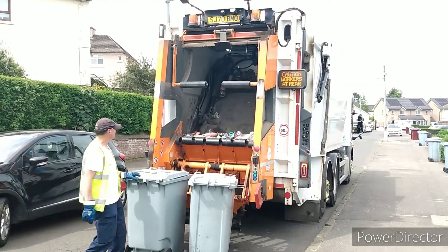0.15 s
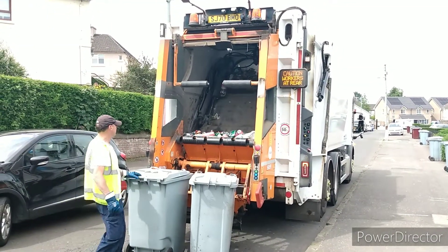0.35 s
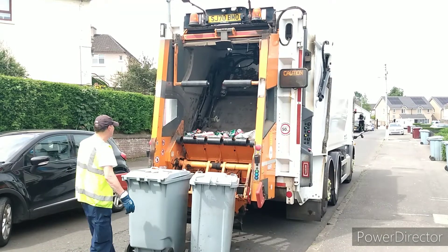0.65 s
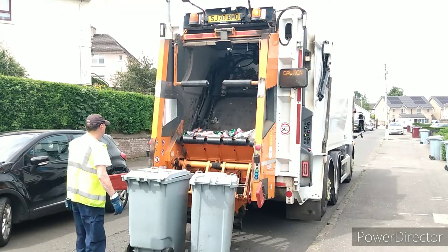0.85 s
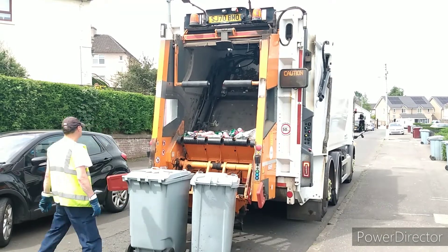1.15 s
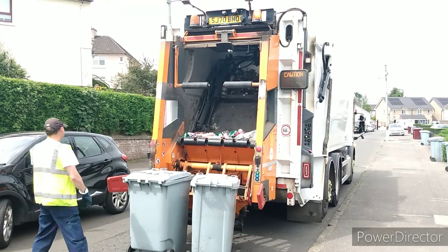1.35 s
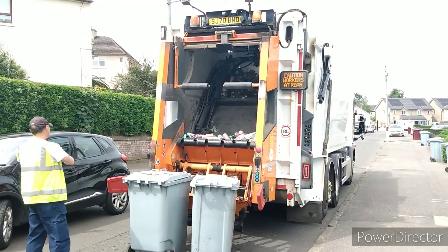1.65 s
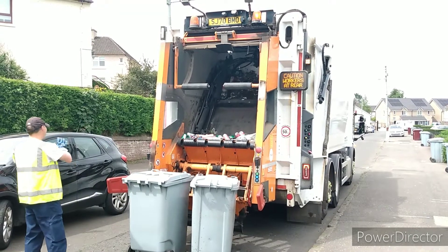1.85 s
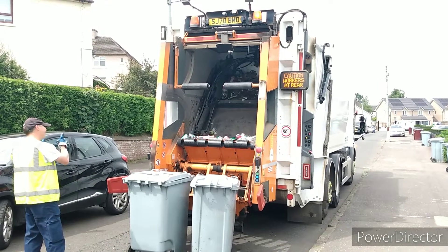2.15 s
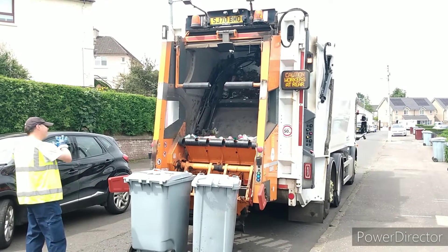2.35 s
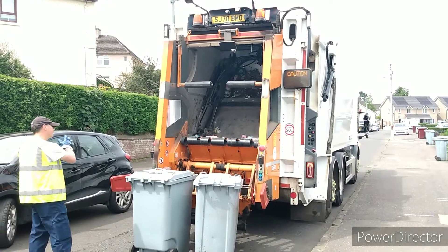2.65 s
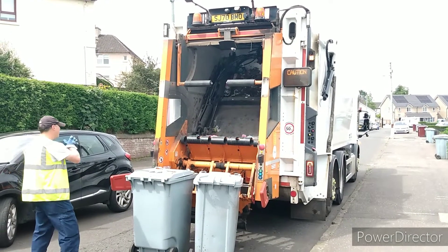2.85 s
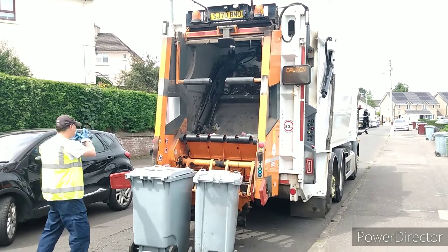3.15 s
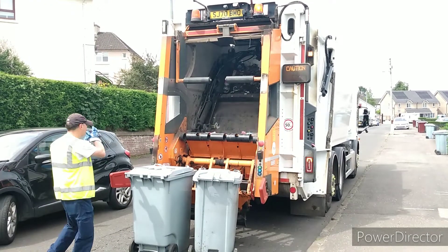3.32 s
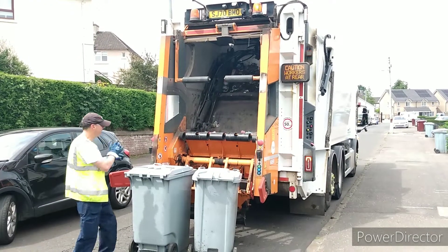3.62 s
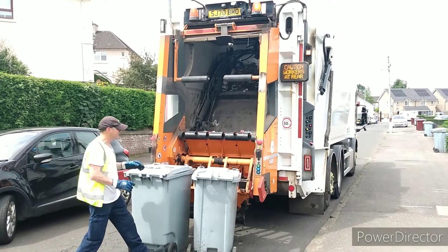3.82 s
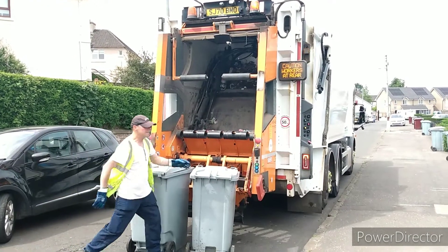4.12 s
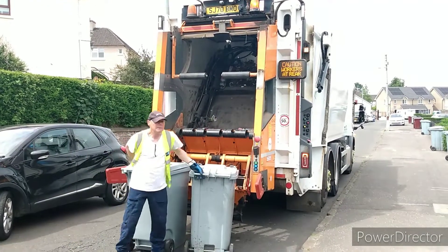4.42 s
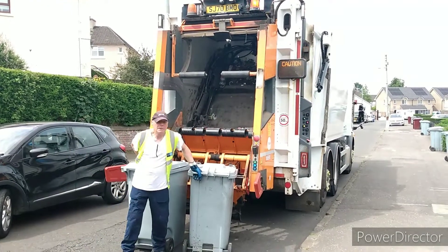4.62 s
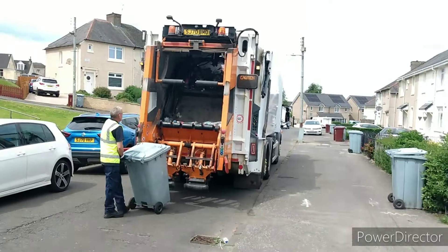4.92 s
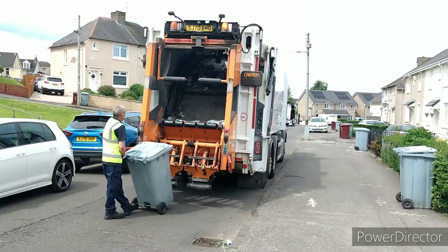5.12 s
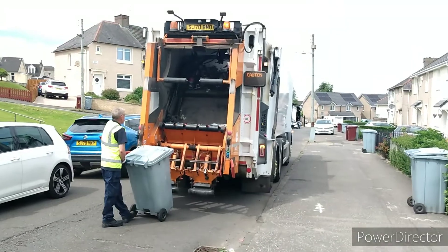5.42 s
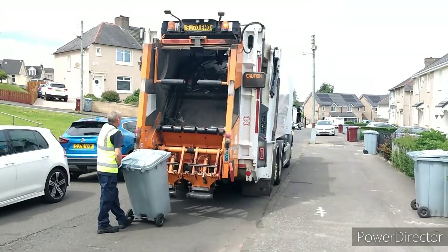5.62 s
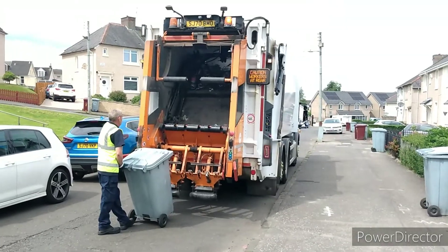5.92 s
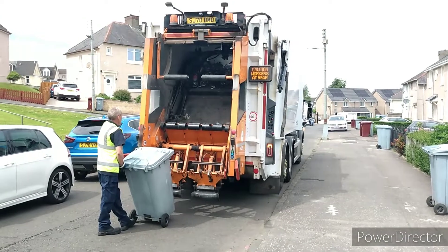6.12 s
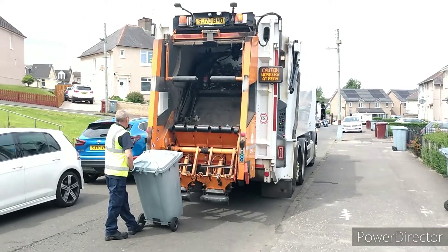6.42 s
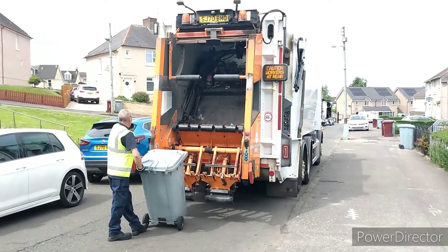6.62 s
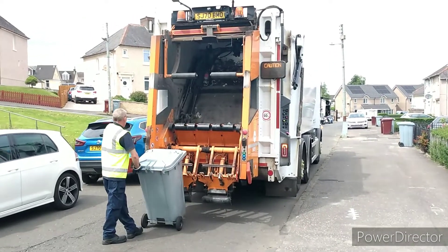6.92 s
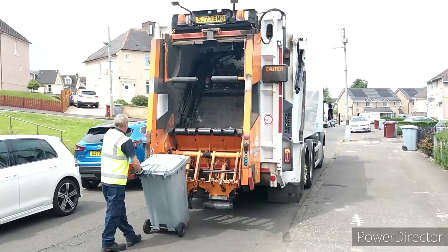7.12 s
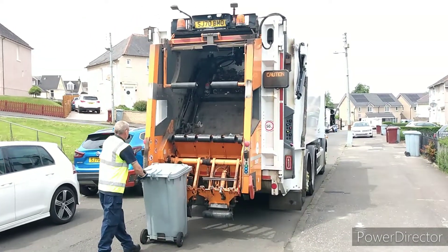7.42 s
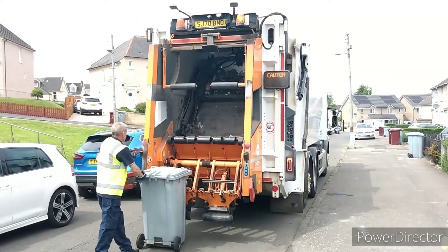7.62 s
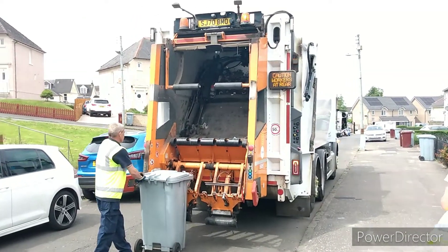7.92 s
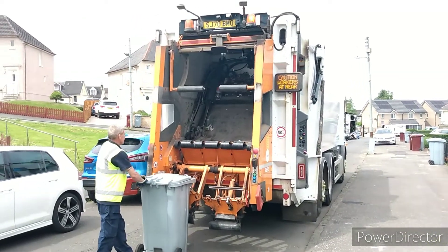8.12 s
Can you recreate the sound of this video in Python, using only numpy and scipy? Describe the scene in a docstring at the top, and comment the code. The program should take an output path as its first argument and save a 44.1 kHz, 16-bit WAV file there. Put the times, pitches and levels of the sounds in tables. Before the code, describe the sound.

Two stretches of a bin lorry working: throbbing engine, swelling oil hiss, rumbling hopper, rattling metal blows, and wind thumps near the end.

```python
"""Refuse truck at the kerb

Two stops with a short silence between them, all built from shaped noise, struck modes and tones.
The diesel clatters behind the body, and oil hisses through the valves as the packer plate moves.
The hopper rumbles in lumpy bass; steel, bins and body ring under rattling blows, with scrapes and ticks.
Narrow hums waver, and near the end wind buffets the left microphone port in sharp pulses."""
import sys
import numpy as np
from scipy import signal
from scipy.fft import rfft, irfft
from scipy.io import wavfile
from scipy.ndimage import uniform_filter1d

SR = 44100
rng = np.random.default_rng(int(sys.argv[2]) if len(sys.argv) > 2 else 0)


def file_out(sig):
    """Save sig as 16-bit WAV at sys.argv[1]."""
    # one column per channel
    cols = np.atleast_2d(sig).T
    # limit, then scale
    lim = np.clip(cols, -1, 1)
    pcm = np.round(lim * 32767).astype(np.int16)
    wavfile.write(sys.argv[1], SR, pcm)


N = 364266
T = np.arange(N) / SR
HZ = np.fft.rfftfreq(1024, 1 / SR)  # bins of the shaped noise
FRAME_S = np.arange(N // 256 + 5) * 256 / SR  # frames of the shaped noise

# the two stops: start t/s, end t/s
STOPS = [(0, 4.885), (4.982, 8.26)]

# stereo likeness of the shaped noise: f/Hz, left-right likeness (1 = alike)
LIKENESS = [(60, 0.95), (300, 1), (700, 0.96), (1400, 0.091), (2500, 1), (4000, 0.051), (15000, 0.065)]
# cavity resonances of the two ports, one list a stop: f/Hz, left-right level/dB
PORT_LEAN = [
    [(200, 3), (500, 3.5), (770, -3), (1150, 1), (1800, -3.5), (2700, -7), (3600, 0.5), (4900, 8.5),
     (6200, 5.5), (7600, 2.5), (9300, 12.5), (10600, 9.5), (12000, 5.5), (16000, -1.5)],
    [(200, 11), (500, 7), (770, -6), (1100, 5), (1800, -4), (2700, -5), (3900, 2.5), (4900, 12.5),
     (6200, 8.5), (7400, -1), (9200, 17.5), (10600, 12.5), (12000, 9.5), (16000, -8)],
]
LAG_S = 4 / SR  # the right port hears the truck later
PATCHY_DB = 1.5  # drifting patches in the noise

# clatter coloured by body panels and ground echo, one list a stop: f/Hz, relative level/dB per Hz
ENGINE_COLOUR = [
    [(300, -48), (420, -44), (520, -1), (700, 1.5), (850, -3), (1000, -3.5), (1200, -2), (1420, -4.5),
     (2100, -1), (2600, -3), (3200, -7.5), (4800, -16), (7000, -17), (9500, -48), (16000, -82)],
    [(300, -28), (440, -20), (520, -5.5), (700, 0.5), (850, -3.5), (1030, -9), (1250, -2.5), (1500, -9),
     (2100, -2.5), (2600, -6), (3400, -9.5), (4100, -23.5), (5500, -14.5), (8000, -26), (9000, -61),
     (16000, -94)],
]
# one list a stop: t/s, engine level/dB, resting hiss of the oil lines level/dB
RUNNING = [
    [(0, -33, -38.5), (.71, -34, -42), (1.34, -33.5, -41.5), (1.82, -30, -37.5), (2.0, -26.5, -33),
     (2.33, -26, -28), (2.65, -30, -28), (2.87, -28.5, -34), (3.116, -34, -37.5), (3.512, -37, -39),
     (3.778, -36.5, -43), (4.578, -38.5, -52.5), (4.72, -37, -65), (4.885, -41, -55.5)],
    [(4.982, -28, -34), (5.17, -30.5, -37), (5.5, -27.5, -34.5), (6.12, -31, -33.5), (6.17, -35, -34),
     (6.43, -38.5, -41.5), (6.69, -35, -35), (6.87, -32.5, -38.5), (7.3, -38.5, -47.5),
     (8.26, -38.5, -58.5)],
]
THROB_PER_S = 17  # mean rate of the firing throb
THROB_WORK_DB, THROB_IDLE_DB = -0.5, 1.5  # the throb stands out once a stroke is over
RATTLE_DB = 1.5  # quick uneven rattle of the panels

# valve hiss, one list a stop: f/Hz, relative level/dB per Hz
OIL_COLOUR = [
    [(1650, -11.5), (2800, -8), (2880, -27), (3240, 6), (3510, 2), (3860, 3), (4800, -1), (6770, -2.5),
     (7550, 0.5), (10300, -1.5), (11400, -3), (13000, -3), (15100, -4), (16000, -53)],
    [(1650, -33), (2800, -24), (2930, -28), (3170, 1), (3690, 3.5), (4770, 0), (6070, 0.5), (6570, 0.5),
     (8240, 1), (9890, -5.5), (10600, -3), (14600, -2.5), (15500, -26), (16000, -38)],
]
# whistling pipe resonances, one list a stop: f/Hz, width/Hz (30 at least is used), relative level/dB
PIPES = [
    [(3040, 110, 4), (4580, 24, -35), (4820, 27, 23), (7600, 230, 6), (8600, 58, -18), (9600, 38, -20),
     (8850, 120, -4), (10200, 38, -2.5), (10400, 50, -2), (10400, 200, -2)],
    [(3260, 140, -1.5), (4270, 92, -1.5), (4710, 85, 0.5), (5120, 26, 4), (6020, 180, -2), (7320, 39, 2.5),
     (7540, 32, -3), (9350, 170, -20), (10600, 91, -25), (11700, 38, -5)],
]
# strokes of the packer plate: valve opens t/s, full flow t/s, middle of the shutting t/s, hiss level/dB
STROKES = [(1.79, 2.5, 2.87, -28.5), (5.194, 5.484, 6.145, -27)]
WHISTLE = 4.0  # most power that a pipe adds, over the plain hiss
EASE_S, EASE_DB, SHUT_S = 0.061, -3.5, 0.066  # the flow eases off before the valve shuts
REST_TOP_HZ, REST_DULL_DB = 10500, -6  # the resting hiss lacks the top of the full flow
TICK_HZ, TICK_DB, TICK_THROB = (8800, 10200), -2, 2.2  # the resting hiss ticks with the firing in this band

# rumble of the hopper: f/Hz, relative level/dB per Hz
HOPPER_COLOUR = [(12, -56), (20, -8.5), (87, -7.5), (162, -5), (215, -1.5), (307, -8), (414, -12.5),
                 (600, -14), (780, -52), (1320, -120)]
# low boom of the hopper, one list a stop: t/s, level/dB, left-right level/dB
HOPPER_BOOM = [
    [(0, -43, 3), (.2, -52.5, 3), (1.28, -56, 3.5), (1.56, -50, 0.5), (1.99, -35.5, -1),
     (2.09, -25.5, -4.5), (2.75, -41, -2), (3.1, -37.5, 1), (3.25, -41.5, 1.5), (3.55, -57, -2),
     (3.72, -41, -3), (4.3, -57.5, 2), (4.55, -49, 3), (4.885, -52.5, 3)],
    [(4.982, -27.5, -10), (5.158, -31, -11), (5.408, -24.5, -11), (5.692, -38.5, -11), (6.146, -31, -10),
     (6.32, -47, -7), (6.42, -35, 3), (6.6, -41, -8), (6.9, -40, -10), (7.0, -39, 30), (8.26, -51.5, 20)],
]
# the load shifts and drums on the hopper floor: loudest t/s, level/dB, slope either side/dB per s
SHIFTS = [(.08, -39, 107), (.34, -52, 150), (.5, -47.5, 118), (.67, -49.5, 108), (1.1, -39.5, 91),
          (1.41, -45, 102), (1.6, -37.5, 100), (1.85, -37, 107), (2.09, -30, 60), (2.252, -32.5, 58),
          (2.45, -36.5, 39), (2.71, -32.5, 67), (2.91, -33.5, 80), (3.03, -38.5, 130), (3.32, -36, 243),
          (3.39, -50, 200), (3.78, -31, 186), (4.16, -47, 192), (4.48, -54.5, 200), (4.72, -46.5, 129),
          (5.12, -31, 151), (5.408, -38.5, 35), (5.836, -36, 46), (6.04, -35, 92), (6.408, -43, 135),
          (6.664, -40.5, 250), (6.86, -32.5, 153), (7.0, -56, 20)]
DRUM_REST_DB, BOOM_LUMPS_DB = -78, 1.0

# bright treble ticks, among them a run of engine ticks near 6.2-6.6 s: t/s, level/dB, t60/s
TICKS = [(0.113, -32, 0.37), (0.399, -31.5, 0.19), (0.718, -28, 0.05), (1.147, -30, 0.064),
         (1.4894, -30, 0.16), (4.3464, -39, 0.047), (4.4924, -49, 0.1), (6.2218, -28, 0.061),
         (6.2562, -28.5, 0.13), (6.306, -30, 0.16), (6.3704, -37, 0.092), (6.4248, -29, 0.048),
         (6.47, -28.5, 0.14), (6.5046, -27, 0.13), (6.5804, -26, 0.062), (6.6356, -27.5, 0.42),
         (6.789, -35, 0.22), (7.2135, -35, 0.078), (7.291, -29, 0.12), (7.9694, -46, 0.046)]
# treble of scrapes and ticks: f/Hz, relative level/dB per Hz
SCRAPE_COLOUR = [(1200, -36), (2500, 1), (4500, -4.5), (7000, -4), (9500, -6.5), (12000, -8.5),
                 (16000, -10.5)]

# blows, and one soft bump of wind at 7.03 s: t/s, clang level/dB, drum level/dB, boom level/dB,
# treble level/dB, build-up/s, rattle length/s, clang centre f/Hz, drum centre f/Hz
KNOCKS = [(0.216, -35, -38.5, -64, -32, 0.0017, 0.046, 2070, 325),
          (0.566, -28.5, -75, -65, -29.5, 0.013, 0.071, 1670, 428),
          (.822, -33, -75, -66, -38, 0.004, 0.013, 2300, 300),
          (0.957, -24.5, -29.5, -50, -26.5, .015, 0.054, 700, 264),
          (1.27, -31, -43, -64, -47, 0.0025, 0.042, 1180, 207),
          (1.524, -30.5, -45, -66, -37, 0.0025, 0.051, 2190, 231),
          (1.801, -27.5, -32.5, -47, -32, 0.0033, 0.093, 1210, 207),
          (1.856, -17.5, -24.5, -26, -26.5, 0.0027, 0.027, 1040, 229),
          (1.966, -14.5, -24, -18, -22, 0.0022, 0.033, 1150, 310),
          (1.993, -19, -27, -42, -42, 0.0038, 0.012, 693, 250),
          (2.119, -25.5, -21.5, -35, -30, 0.0021, 0.089, 2210, 221),
          (2.277, -20, -23, -42, -24, 0.0024, 0.029, 810, 290),
          (2.635, -25.5, -26.5, -20.5, -39, 0.0019, 0.042, 710, 151),
          (3.627, -23.5, -18, -33, -30.5, .011, 0.033, 540, 248),
          (3.901, -33.5, -53, -60, -52, .002, 0.015, 2260, 229),
          (4.564, -33, -43, -64, -46, .008, 0.042, 2180, 218),
          (4.697, -52, -35, -68, -52, 0.0018, 0.024, 638, 278),
          (4.997, -26, -20, -14.5, -35, 0.003, 0.014, 517, 250),
          (5.008, -20.5, -19.5, -22, -35, 0.0045, 0.013, 640, 300),
          (5.233, -18, -14, -16.5, -38, 0.0017, 0.026, 790, 310),
          (5.311, -27, -28, -22, -31, 0.0036, 0.013, 592, 200),
          (5.334, -27, -28, -18, -27, 0.0032, 0.045, 620, 287),
          (5.859, -31, -36, -23, -38, 0.00187, 0.021, 1160, 288),
          (5.895, -22.5, -23, -14, -43, 0.0023, 0.03, 680, 161),
          (6.376, -35, -36, -60, -36.5, 0.0021, 0.037, 2060, 151),
          (6.415, -30.5, -36, -31, -42, 0.0025, 0.057, 795, 188),
          (6.679, -23, -20, -28, -35, .014, 0.034, 600, 297),
          (6.786, -30.5, -30.5, -41, -39, 0.022, 0.11, 1450, 300),
          (7.027, -37, -45, -39, -43, 0.0015, 0.025, 549, 164),
          (7.478, -33.5, -32, -35, -47, 0.0013, 0.062, 775, 151),
          (7.88, -25, -35, -30, -37, 0.002, 0.012, 1920, 272),
          (7.897, -31, -32, -28, -57, 0.0019, 0.022, 785, 200),
          (7.914, -38, -25, -27, -57, .002, 0.013, 560, 274)]
# modes of the steel plate: f/Hz, relative level/dB, t60/s
PLATE = [(545, -1, 0.13), (590, 1, 0.14), (700, 6, 0.08), (790, 1, 0.06), (1100, -1, 0.05),
         (1170, -1, 0.15), (1205, 7, 0.045), (1285, 0, 0.07), (1590, 9, 0.025), (1740, -3, 0.033),
         (2120, 12.5, 0.036), (2485, 14.5, 0.026), (2660, -4.5, 0.02), (3380, -8, 0.036),
         (3940, -28, 0.023), (4250, 4, 0.035)]
# modes of bins and hopper floor: f/Hz, relative level/dB, t60/s
THUDS = [(171, -12, 0.18), (214, -4.5, 0.23), (247, 1, 0.13), (305.8, 5, 0.16), (343, -9, 0.078)]
# modes of the empty body: f/Hz, relative level/dB, t60/s
BODY = [(64.6, -24.5, 0.1), (101.6, 9.5, 0.17), (126.4, 9, 0.08)]
# spans where the steel rings freely: start t/s, end t/s
FREE_RING = [(1.84, 2.3), (3.6, 3.7), (5.2, 5.3)]
DAMPED = .45  # share of the plate's ring time left in other blows
DETUNE = .01  # each blow finds the modes a little shifted, as a share of the pitch
CLANG_PAN_DB = -1  # left-right
DULL_HZ, BRIGHT_HZ = 690, 1600  # clang centres below are dull, above are bright
# fall of the clang and drum per octave away from their centres; the clang's by the colour of the blow
FOCUS_DULL_DB, FOCUS_MID_DB, FOCUS_BRIGHT_DB, THUD_FOCUS_DB = 8.5, 8.5, 9, 18
FIRST_PUSH = 5.9  # weight of the first contact on the heavy parts

# hard contacts within the blows, with no ring: t/s, level/dB, top f/Hz, t60/s
CRACKS = [(5.01, -27, 1500, 0.13), (1.967, -20, 3500, .08), (2.2795, -21, 1500, 0.06),
          (2.287, -20, 2980, 0.095), (2.305, -20, 2800, 0.068), (3.64, -27, 2300, 0.2),
          (5.245, -19, 2500, .08), (5.251, -22, 2900, .1), (5.897, -22.5, 2600, 0.16),
          (6.695, -34, 2600, 0.2), (6.417, -27, 2500, 0.055), (7.8813, -23, 6640, 0.054),
          (7.904, -24, 4180, 0.055)]
CRACK_LOW_HZ = 448

# whines and hums, mostly while a ram is loaded: start t/s, end t/s, start f/Hz, end f/Hz,
# level/dB, growth/dB, fast wobble as a share of the pitch
TONES = [(2.3, 2.58, 2690, 2760, -36, 5, 0.003), (2.3, 2.95, 1940, 2060, -40, 0, .008),
         (2.4, 2.8, 1970, 1985, -45, 2, .005), (3.03, 3.22, 2050, 2050, -52, 0, 0.0049),
         (2.83, 3.07, 1205, 1182, -43, 2, .004), (3.0, 3.4, 1180, 1187, -41, -5, .004),
         (3.4, 3.63, 1200, 1207, -45, 0, 0.004), (3.44, 3.66, 630, 790, -38, 7, 0.05),
         (2.4, 2.9, 4790, 4800, -47, 0, 0.0029), (2.5, 2.85, 3600, 4260, -47, 0, 0.00196),
         (5.5, 6.1, 4825, 4825, -42, -2, 0.0021), (5.484, 6, 205, 210, -37.5, 1.5, .005)]
TONE_ENDS_DB, TONE_FADE_S = -2.5, .04  # each swells and sinks

# a short puff of air: middle t/s, half length/s, level/dB, low f/Hz, high f/Hz
PUFF = (4.245, .055, -52, 9500, 13200)

# colour of the wind pulses: f/Hz, relative level/dB per Hz
GUST_COLOUR = [(12, -54), (20, -19), (58, 2), (119, 1), (253, -5), (300, -10), (400, -14.5), (700, -24.5),
               (1000, -39), (1300, -69), (2200, -120)]
# gusts on the left port: start t/s, held/s, level/dB in the mean of both ports
GUSTS = [(6.935, 0.019, -33.5), (7.026, 0.045, -19.5), (7.11, .05, -30), (7.183, 0.053, -23.5),
         (7.283, 0.034, -23.5), (7.34, .03, -32), (7.385, 0.069, -28), (7.475, .02, -33),
         (7.521, 0.042, -24), (7.582, 0.0099, -29), (7.655, 0.03, -27.5), (7.736, 0.049, -28),
         (7.895, 0.034, -28.5), (8.113, 0.018, -28)]
# the hardest eddies: t/s, pulse size (negative for a pull)
PUSHES = [(7.03, 2), (7.043, 3), (7.065, -2), (7.188, -3), (7.214, 2), (7.243, 2), (7.295, 2.5), (7.322, 2),
          (7.34, 2), (7.393, 2), (7.422, 2), (7.54, 2), (7.59, 2), (7.774, 2), (8.117, 2.5)]
GUST_RISE, GUST_FALL = 1300, 300  # dB per s

# a small metal part rings: t/s, first f/Hz, settled f/Hz, level/dB, t60/s
PING = (7.291, 4640, 4470, -31, .085)

EDGE_HZ = 15750  # upper band limit


def gain_of(db):
    """Turn level in dB into amplitude."""
    return 10 ** (np.asarray(db) / 20)


def evened(x):
    """Bring a signal to rms 1."""
    return x / np.sqrt(np.mean(x ** 2) + 1e-20)


def read(points, hz):
    """Read a curve between its points, along log frequency."""
    f, value = np.transpose(points)
    return np.interp(np.log(hz + 1), np.log(f + 1), value)


def follow(tables, column):
    """Follow one column of the tables, joined in time."""
    rows = np.vstack(tables)
    return np.interp(T, rows[:, 0], rows[:, column])


def smoothed(x, width):
    """Average twice over a sliding window."""
    return uniform_filter1d(uniform_filter1d(x, width), width)


def slow(width):
    """Smooth chance of rms 1 that changes over width samples."""
    return evened(smoothed(rng.standard_normal(N), width))


def filtered(x, order, hz, kind):
    """Pass a signal through a Butterworth filter."""
    return signal.sosfilt(signal.butter(order, hz, kind, fs=SR, output="sos"), x)


def low_part(x, order, hz):
    """Take the lows without delay, so that the rest of the signal is a plain remainder."""
    return signal.sosfiltfilt(signal.butter(order, hz, fs=SR, output="sos"), x)


def panned(db):
    """Spread a left-right level difference evenly over both ports, in dB."""
    return np.array([[.5], [-.5]]) * db


def by_stop(first, second):
    """Bins by frames: one spectrum at the first stop, another at the second."""
    return np.where(FRAME_S < STOPS[1][0], first[:, None], second[:, None])


def noise(field_db, patchy_db):
    """Noise at both ports, alike in the bass, with drifting patches; the mean of the ports has rms 1 at each stop."""
    a, b, c, d, patches = rng.standard_normal((len(FRAME_S), 513, 5), dtype=np.float32).T
    patches = evened(uniform_filter1d(uniform_filter1d(patches, 8, 0), 12, 1))
    same = np.clip(read(LIKENESS, HZ), -1, 1)[:, None]
    lean = gain_of(by_stop(*(read(points, HZ) / 2 for points in PORT_LEAN)))
    left = a + 1j * b
    right = same * left + np.sqrt(1 - same ** 2) * (c + 1j * d)
    right = right * np.exp(-2j * np.pi * HZ * LAG_S)[:, None]
    field = np.array([left * lean, right / lean]) * gain_of(field_db + patchy_db * patches)
    out = signal.istft(field, nperseg=1024, noverlap=768)[1][:, :N]
    first = T < STOPS[1][0]
    return out / np.where(first, out[:, first].mean(0).std(), out[:, ~first].mean(0).std())


def peaks_db(at, db, rise, fall, held=0):
    """Level of swells that climb, hold for a time and sink again, with slopes in dB per s."""
    rise, fall, held = (np.asarray(value)[..., None] for value in (rise, fall, held))
    late = T[::64] - at[:, None]
    slope = np.minimum(rise * late, np.minimum(fall * (held - late), 0))
    power = (gain_of(db[:, None] + slope) ** 2).sum(0)
    return np.interp(T, T[::64], 10 * np.log10(power + 1e-12))


def add(mix, s, sound):
    """Lay a sound into the mix from time s, cut at the end."""
    part = mix[..., round(s * SR):][..., :sound.shape[-1]]
    part += sound[..., :part.shape[-1]]


def throb():
    """Each firing cycle gives a quick rise and a slower fall, unevenly."""
    turns = np.cumsum(THROB_PER_S * (1 + 0.056 * slow(4000))) / SR
    beat = uniform_filter1d(np.exp(-(turns % 1) / 0.59), 150)
    idle = sum((T > stroke[2]) & (T < stop[1]) for stroke, stop in zip(STROKES, STOPS))
    depth_db = np.where(idle, THROB_IDLE_DB, THROB_WORK_DB)
    return depth_db * evened(beat - beat.mean()) * (1 + 0.1 * slow(3000))


def engine(beat_db):
    """Diesel clatter coloured by the body panels; the injector ticks throb in the treble."""
    clatter = noise(by_stop(*(read(points, HZ) for points in ENGINE_COLOUR)), 1.34)
    low = low_part(clatter, 3, 3300)
    level = gain_of(follow(RUNNING, 1) + 0.67 * slow(900))
    low_gain = gain_of(0.052 * beat_db + RATTLE_DB * slow(200))
    return level * (low_gain * low + gain_of(beat_db) * (clatter - low))


def flow():
    """Oil flow through the valves: builds up, holds, eases, and is shut off."""
    total = np.zeros(N)
    for opens, full, shut, db in STROKES:
        ease_db = EASE_DB * np.clip(1 - (shut - T) / EASE_S, 0, 1)
        opening = (T - opens) / (full - opens)
        closing = (shut - T) / SHUT_S + .5
        total += gain_of(db + ease_db) * np.clip(np.minimum(opening, closing), 0, 1)
    return total


def oil(beat_db):
    """Turbulent hiss through the valves, with narrow pipe resonances."""
    colours = []
    for spectrum, pipes in zip(OIL_COLOUR, PIPES):
        lift = sum(gain_of(db) ** 2 / (1 + (2 * (HZ - hz) / max(width, 30)) ** 2) for hz, width, db in pipes)
        colours.append(read(spectrum, HZ) + 10 * np.log10(1 + WHISTLE * lift / lift.max()))
    hiss = noise(by_stop(*colours), PATCHY_DB)
    low = low_part(hiss, 4, REST_TOP_HZ)
    rest, stroke = gain_of(follow(RUNNING, 2)), flow()
    low_level = np.hypot(rest, stroke)
    top_level = np.hypot(gain_of(REST_DULL_DB) * rest, stroke)
    steady = gain_of(0.44 * beat_db + 0.31 * slow(500)) * (low_level * low + top_level * (hiss - low))
    tick_noise = filtered(np.roll(hiss, 2000, axis=1), 2, TICK_HZ, "band")  # a shifted copy of the hiss
    return steady + gain_of(TICK_DB + TICK_THROB * beat_db) * rest * tick_noise


def hopper():
    """Lumpy low rumble of waste and plate: a boom below and a drumming above."""
    low = noise(read(HOPPER_COLOUR, HZ)[:, None], 2 * PATCHY_DB)
    boom = low_part(low, 4, 150)
    boom_level = gain_of(follow(HOPPER_BOOM, 1) + BOOM_LUMPS_DB * slow(900))
    at, db, slope = np.transpose(SHIFTS)
    drum_level = np.hypot(gain_of(peaks_db(at, db, slope, slope)), gain_of(DRUM_REST_DB))
    drum_level = drum_level * gain_of(1.0 * slow(600))
    pan = gain_of(panned(follow(HOPPER_BOOM, 2)))
    return pan * (boom_level * evened(boom) + drum_level * evened(low - boom))


def tick_level():
    """Level of the bright treble ticks: each jumps up and dies exponentially."""
    level, t = np.zeros(N), np.arange(SR // 6) / SR
    for s, db, t60 in TICKS:
        add(level, s, gain_of(db - 60 * t / t60) * np.minimum(t / 0.0056, 1))
    return level


def ring(modes, centre_hz, narrow_db, spread_db, lasting=1):
    """The modes of a body after one click: favoured near the centre of the blow, a little different each time."""
    t, out = np.arange(SR // 4) / SR, 0
    for (hz, db, t60), (u, v) in zip(modes, rng.standard_normal((len(modes), 2))):
        start_db = db - narrow_db * abs(np.log2(hz / centre_hz)) + spread_db * u
        decay = gain_of(start_db - 60 * t / (lasting * t60))
        out = out + decay * np.sin(2 * np.pi * hz * (1 + DETUNE * v) * t)
    return out


def struck(drive, body, db, low_hz):
    """A body driven by a rattle; a panel sends out little below its lowest mode."""
    sound = filtered(signal.fftconvolve(drive, body[None], axes=1), 2, low_hz, "high")
    loudest = np.sqrt(uniform_filter1d(sound.mean(0) ** 2, 400).max())
    return gain_of(db) * sound / loudest


def street(x):
    """House fronts and the hollow body send each blow back as a tail, longest in the middle range."""
    t = np.arange(SR // 2) / SR
    chance = rng.standard_normal((3, len(t))) * np.minimum(t / 0.051, 1)
    hz, s, z = signal.stft(chance, SR, nperseg=512)
    t60 = read([(100, 0.36), (300, 0.45), (700, 0.58), (2000, 0.49)], hz)[:, None]
    tail = signal.istft((z[0] + .5 * z[1:]) * gain_of(-60 * s / t60), SR, nperseg=512)[1]
    return signal.oaconvolve(x, tail / np.linalg.norm(tail[0]), axes=1)[:, :N]


def knocks():
    """Blows, and one soft bump of wind, rattle for a moment and drive the modes, with a burst of treble."""
    out, treble = np.zeros((2, N)), tick_level()
    t = np.arange(SR // 6) / SR
    for s, clang_db, drum_db, boom_db, treble_db, rise, length, clang_hz, drum_hz in KNOCKS:
        dull, contact = clang_hz < DULL_HZ, round(rise * SR)
        build = np.minimum(t / rise, 1)
        held = np.exp(-(np.maximum(t - rise, 0) / length) ** 2) * build  # the parts chatter, then settle
        rattle = rng.standard_normal((2, len(t))) * (rng.random(len(t)) < 900 / SR) * held
        rattle[:, contact] = 0.9 if dull or rise > .005 else 1.8  # main contact, soft if dull or slow
        rattle[1] = np.roll(0.89 * rattle[0] + 0.2 * rattle[1], round(LAG_S * SR))

        # heavy parts feel the start of the blow as a slower push
        near_contact = abs(np.arange(len(t)) - contact) < 10
        weight = np.exp(-t / length) * np.where(near_contact, FIRST_PUSH, 1)
        push = uniform_filter1d(rattle * weight, 50)
        strike = smoothed(rattle, 24) if dull else rattle  # softened when dull, as plastic cushions a blow

        lasting = 1 if any(start < s < end for start, end in FREE_RING) else DAMPED
        focus_db = FOCUS_DULL_DB if dull else FOCUS_BRIGHT_DB if clang_hz > BRIGHT_HZ else FOCUS_MID_DB
        plate = ring(PLATE, clang_hz, focus_db, spread_db=1.8, lasting=lasting)
        bins = ring(THUDS, drum_hz, THUD_FOCUS_DB, spread_db=3.7, lasting=np.sqrt(lasting))
        body = ring(BODY, 92, narrow_db=0, spread_db=1.0)
        add(out, s, struck(strike, plate, clang_db + panned(CLANG_PAN_DB), low_hz=400))
        add(out, s, struck(push, bins, drum_db, low_hz=140))
        add(out, s, struck(push, body, boom_db, low_hz=60))
        add(treble, s, gain_of(treble_db) * (0.22 * held + 0.81 * np.exp(-t / length)) * build)
    out = out + cracks() + puff() + ping()
    bright = noise(read(SCRAPE_COLOUR, HZ)[:, None], PATCHY_DB)
    return out + gain_of(-9.5) * street(out) + treble * bright


def cracks():
    """Hard contacts: sudden bursts of band noise that die at once."""
    out, t = np.zeros((2, N)), np.arange(SR // 6) / SR
    for s, db, top_hz, t60 in CRACKS:
        burst = rng.standard_normal(len(t)) + 0.24 * rng.standard_normal((2, len(t)))
        burst = evened(filtered(burst, 3, [CRACK_LOW_HZ, top_hz], "band"))
        add(out, s, gain_of(db - 60 * t / t60) * np.minimum(t / 0.00063, 1) * burst)
    return out


def hums():
    """Narrow wavering tones that glide, swell and sink."""
    out = np.zeros(N)
    for start, end, first_hz, last_hz, db, growth_db, rough in TONES:
        along = np.clip((T - start) / (end - start), 0, 1)
        fade = np.clip(np.minimum(T - start, end - T) / TONE_FADE_S, 0, 1)
        swell_db = TONE_ENDS_DB * (2 * along - 1) ** 2 + growth_db * (along - .5)
        wobble = 1 + 0.00272 * slow(1500) + rough * slow(150)
        turns = np.cumsum((first_hz + (last_hz - first_hz) * along) * wobble) / SR
        level = np.sqrt(2) * gain_of(db + 1.8 * slow(1500) + swell_db)  # root 2 makes it an rms level
        out += level * fade * np.sin(2 * np.pi * turns)
    return out


def puff():
    """A short puff of air: a soft swell of high band noise."""
    s, half, db, low_hz, high_hz = PUFF
    air = filtered(rng.standard_normal((2, N)), 3, [low_hz, high_hz], "band")
    return gain_of(db) * np.exp(-((T - s) / half) ** 2) * evened(air)


def wind():
    """Eddies move the left diaphragm in sharp pulses, mostly pushes with some pulls."""
    eddies = gain_of(1.8 * np.minimum(rng.exponential(1, N), 3)) * (rng.random(N) < 130 / SR)
    eddies *= np.where(rng.random(N) < .7, 1, -1)
    for s, size in PUSHES:
        eddies[round(s * SR)] = size
    colour = gain_of(read(GUST_COLOUR, np.fft.rfftfreq(N, 1 / SR)))
    pulses = irfft(rfft(eddies) * colour, N)
    steady = pulses / np.sqrt(uniform_filter1d(pulses ** 2, 3500) + 1e-20)
    at, held, db = np.transpose(GUSTS)
    left = 2 * gain_of(peaks_db(at, db, GUST_RISE, GUST_FALL, held)) * steady  # doubled: levels are port means
    return left * gain_of([[0], [-24]])


def ping():
    """A small metal part rings as a decaying sine whose pitch drops quickly to rest."""
    out, t = np.zeros((2, N)), np.arange(SR // 6) / SR
    s, first_hz, settled_hz, db, t60 = PING
    hz = settled_hz + (first_hz - settled_hz) * np.exp(-t / 0.008)
    tone = np.sin(2 * np.pi * np.cumsum(hz) / SR)
    add(out, s, gain_of(db - 60 * t / t60) * np.minimum(t / 0.002, 1) * tone[None])
    return out


def scene():
    """Mix all sources; engine and oil share one firing throb."""
    beat_db = throb()
    return engine(beat_db) + oil(beat_db) + hopper() + knocks() + hums() + wind()


def record(dry):
    """The deepest bass is cut away; silence between the two stops; then the band limit."""
    thin = filtered(dry, 3, 55, "high")
    fade_out = (STOPS[0][1] - T) / 0.015
    fade_in = (T - STOPS[1][0]) / 0.0012
    on = np.clip(np.maximum(fade_out, fade_in), 0, 1)
    band_limit = signal.firwin(801, EDGE_HZ, window=("kaiser", 11), fs=SR)
    return signal.oaconvolve(thin * on, band_limit[None], "same")


dry = scene()
out = record(dry)
file_out(out)
```